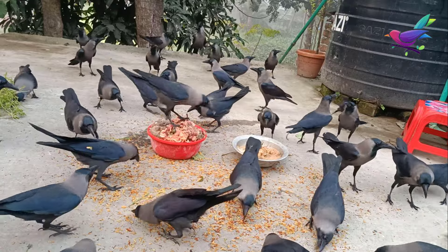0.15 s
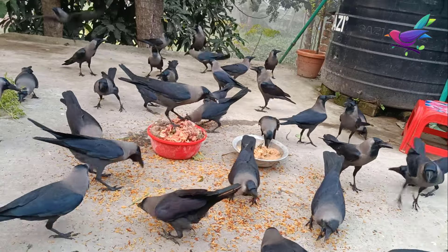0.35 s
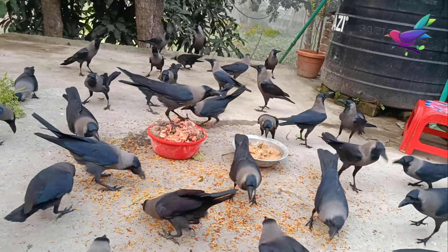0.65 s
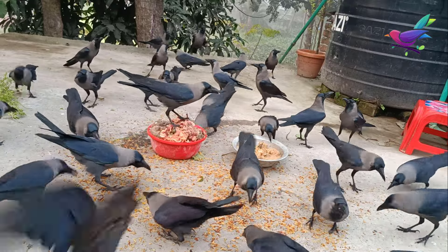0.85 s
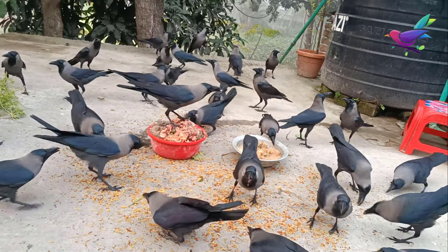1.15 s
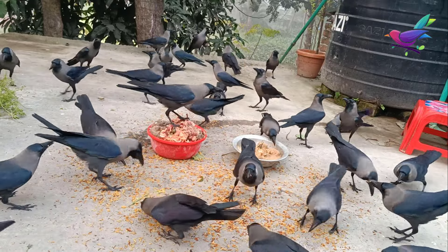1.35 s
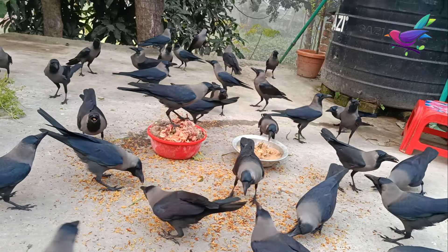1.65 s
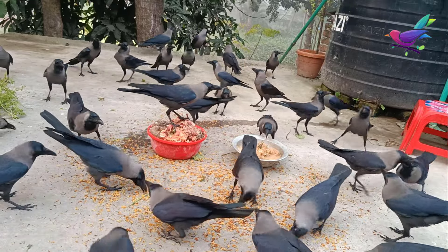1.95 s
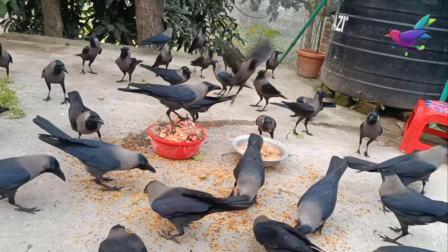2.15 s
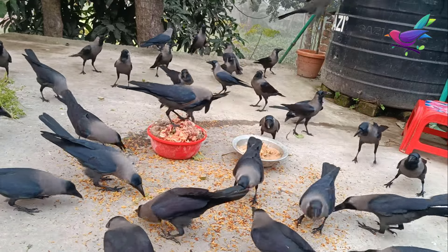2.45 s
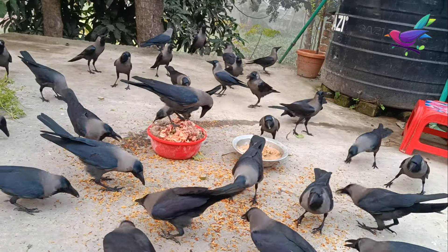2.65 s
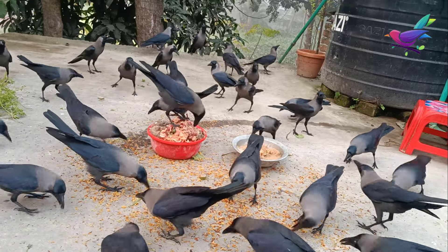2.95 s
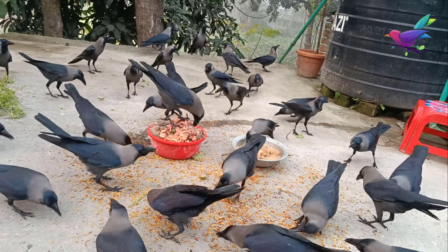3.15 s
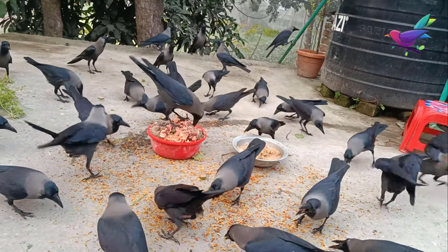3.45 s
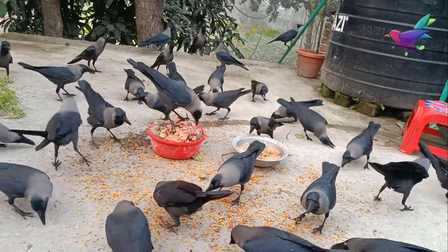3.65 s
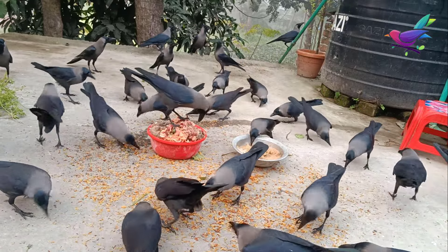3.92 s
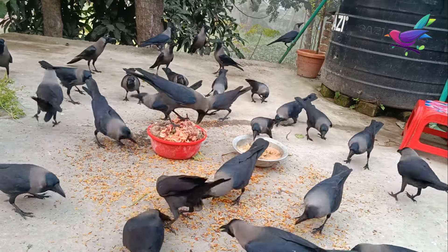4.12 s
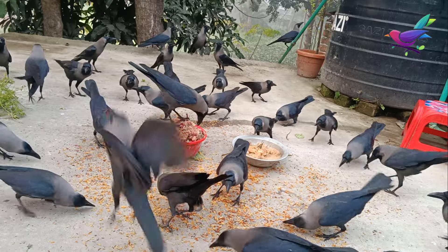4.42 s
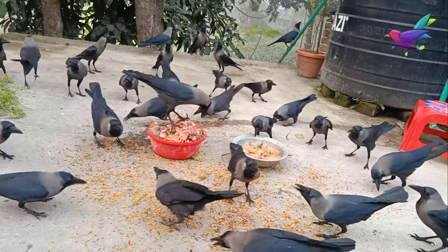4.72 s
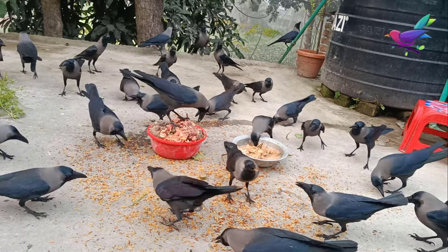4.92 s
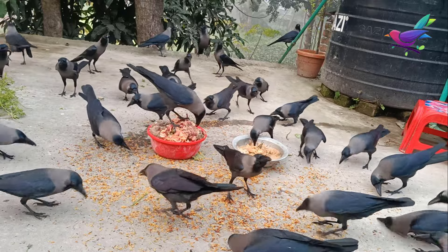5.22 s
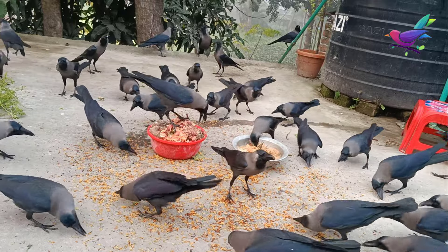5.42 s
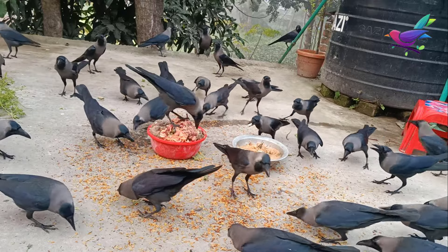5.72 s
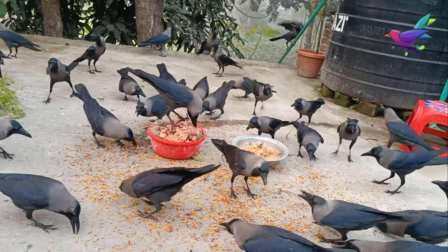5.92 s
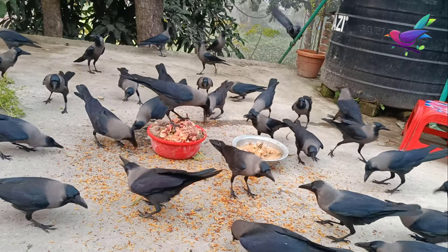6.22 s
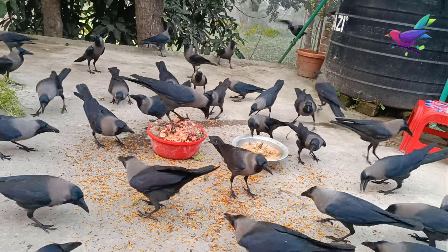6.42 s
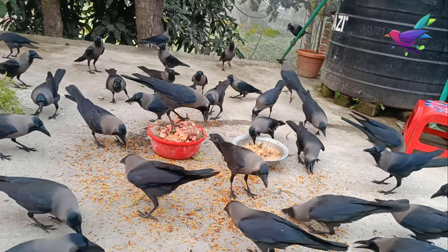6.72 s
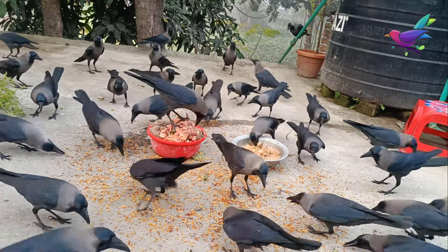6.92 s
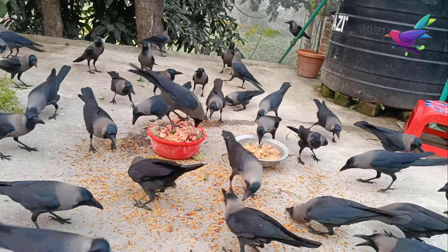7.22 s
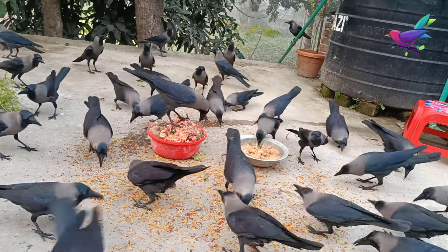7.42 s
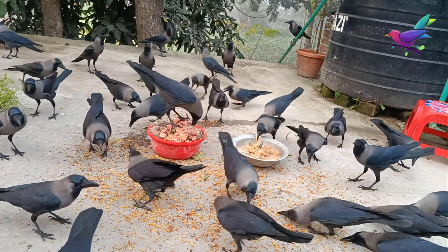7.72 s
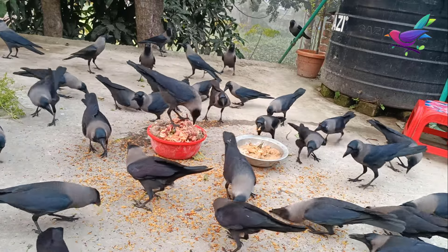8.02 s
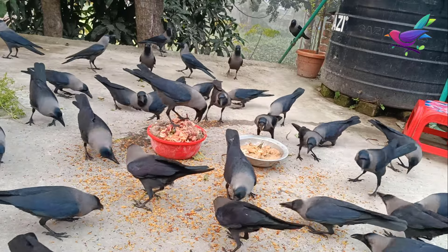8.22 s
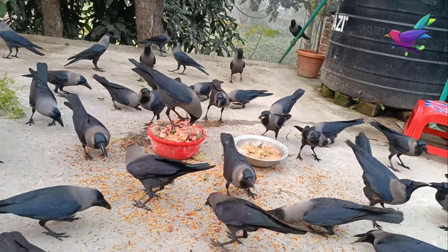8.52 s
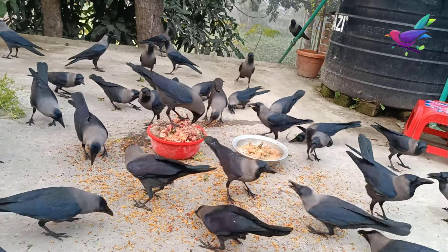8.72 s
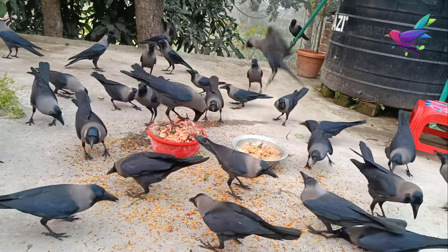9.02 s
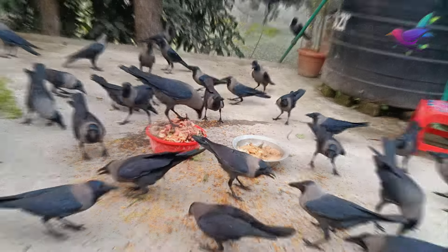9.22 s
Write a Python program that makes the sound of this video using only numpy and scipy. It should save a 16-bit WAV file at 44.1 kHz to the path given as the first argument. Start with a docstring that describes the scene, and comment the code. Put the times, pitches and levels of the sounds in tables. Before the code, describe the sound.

Close stereo pickup of a noisy crow flock outdoors: dry, rattling caws at slightly different pitches, a few thinner and clearer. Soft pecks and claw patter run beneath. Wingbeats push deep puffs of air at the microphone around two seconds, and a sharp thump lands on the left near six. Short lulls follow, then overlapping caws return with faint scratchy whistles over a quiet outdoor rumble.

```python
"""In a concrete yard a flock of house crows feeds and caws, close to a phone with two microphone ports.
Each caw is a reedy tone chopped and bent by a rattle of some 70 beats a second, shaped by throat and open bill;
three thinner caws are partials gliding together. Wings push gusts of air over the ports and thump,
bills and claws tick on the ground, a small bird whistles behind, and filtered noise is the air outdoors."""
import sys
import numpy as np
from scipy import signal
from scipy.fft import rfft, irfft, next_fast_len
from scipy.io import wavfile
from scipy.ndimage import map_coordinates

SR = 44100
rng = np.random.default_rng(int(sys.argv[2]) if len(sys.argv) > 2 else 0)


def persist_wave(psi):
    """Save psi, clipped to +-1, as 16-bit WAV."""
    counts = np.round(np.clip(psi, -1, 1) * 32767).astype(np.int16)
    wavfile.write(sys.argv[1], SR, np.atleast_2d(counts).T)


N = 413216
TIME = np.arange(N) / SR


def undb(db):
    """Decibels to gain."""
    return 10 ** (np.asarray(db) / 20)


def unit(x):
    """Scale to rms 1."""
    return x / np.sqrt(np.mean(x ** 2) + 1e-18)


def colour(x, points, extra=lambda hz: 0):
    """Causal (minimum-phase) filter through (Hz, dB) points, with an optional extra dB curve."""
    size = next_fast_len(x.shape[-1] // 2 + 1024) * 2
    hz = np.arange(size // 2 + 1) * SR / size + 1
    at_hz, db = np.transpose(points)
    curve_db = np.interp(np.log(hz), np.log(at_hz), db) + extra(hz)
    # folding the cepstrum onto positive times makes the filter causal
    cepstrum = irfft(np.log(undb(curve_db)))
    cepstrum[1:size // 2] *= 2
    cepstrum[size // 2 + 1:] = 0
    response = np.exp(rfft(cepstrum))
    return irfft(rfft(x, size) * response, size)[..., :x.shape[-1]]


def sliding_colour(x, points, extra, scale):
    """Like colour, but the filter's frequencies move by a factor that changes with time."""
    clock = np.cumsum(scale)
    source_place = np.interp(np.arange(clock[-1]), clock, np.arange(len(x)))
    warped = map_coordinates(x, [source_place])
    return map_coordinates(colour(warped, points, extra), [clock])


def walk(t, rate):
    """Smooth chance of spread near 1, with a new random value `rate` times a second."""
    values = rng.standard_normal(4096)
    return 1.23 * np.interp(t * rate, np.arange(len(values)), values)


def swell(u, attack, release):
    """Attack, hold and release over a sound's course from 0 to 1."""
    return np.clip(np.minimum(u / attack, (1 - u) / release), 0, 1)


def sides(db):
    """Left and right gains of equal total power for a level difference."""
    half = np.atleast_1d(db) / 2
    pair = np.array([undb(half), undb(-half)])
    return pair / np.sqrt(np.mean(pair ** 2, axis=0))


def add(out, start, x):
    """Mix a stereo sound in at a time in seconds."""
    i = int(start * SR)
    lo, hi = max(i, 0), min(i + x.shape[1], N)
    if hi > lo:
        out[:, lo:hi] += x[:, lo - i:hi - i]


WALLS_DB, WALLS_SPREAD_S = -2.5, .024  # early echoes against the direct sound, and their span


def at_ports(x, lag_ms, walls_db=WALLS_DB, shade_db=2.5, balance_db=-1.5, count=14):
    """The direct sound reaches one port first; ground, tank and walls add scattered early echoes."""
    size = 32768
    hz = np.arange(size // 2 + 1) * SR / size
    # half the lag on each port, in opposite directions; a positive lag delays the left
    direct = np.exp(-1j * np.pi * hz * lag_ms / 1000 * np.array([[1], [-1]]))
    echoes = np.zeros((2, size))
    for ear in echoes:
        late = rng.random(count)
        strengths = rng.choice([-1, 1], count) * np.exp(-late)
        ear[(SR * WALLS_SPREAD_S * late).astype(int)] = unit(strengths) / np.sqrt(count)
    walls = undb(walls_db)
    paths = (direct + walls * rfft(echoes)) / np.hypot(1, walls)
    # the lag also shifts the balance towards the port that hears the sound first
    return irfft(rfft(x, size) * paths) * sides(balance_db - shade_db * lag_ms)


YARD_T60_S, YARD_DB = .26, -14  # decay by 60 dB; level of the tail against the direct sound


def yard(x):
    """A short, faint tail from house fronts and trees: noise that fades exponentially."""
    t = np.arange(SR // 2) / SR
    tail = rng.standard_normal((2, len(t))) * undb(-60 * t / YARD_T60_S) * np.minimum(t / .02, 1)
    tail = unit(tail) / np.sqrt(len(t))
    return x + undb(YARD_DB) * signal.fftconvolve(x, tail, axes=1)[:, :N]


# The air of the place, far from the microphone. Each row: frequency in Hz, relative level in dB.
AIR_COLOUR = [(25, -0.5), (50, 2), (100, -5), (200, -6.5), (400, -12.5), (800, -15), (2000, -22.5),
              (3200, -30.5), (5000, -30), (9000, -36), (15000, -52)]
AIR_DB, SWELL_DB = -42.5, 1.2  # level; spread of its slow wavering


def outdoors():
    """Distant rumble and rustle, as filtered noise; the bass is alike at both ports."""
    mid = colour(rng.standard_normal(N), AIR_COLOUR)
    side = colour(rng.standard_normal(N), AIR_COLOUR, lambda hz: -14 / (1 + (hz / 350) ** 2))
    ports = mid + side * np.array([[1], [-1]])
    return unit(ports) * undb(AIR_DB + SWELL_DB * walk(TIME, 8.2))


WHISTLE_ATTACK, WHISTLE_RELEASE = 0.15, 0.3  # shares of a note's length
WHISTLE_CLIMB_PER_S, WHISTLE_SLUR_S = 1.5, .024  # relative climb; time to half the snap down
WHISTLE_RISE_DB_PER_S, WHISTLE_FADE_DB_PER_S = 130, 35
# A small bird's notes, behind the crows. Each row: time of the pitch top in seconds, rise in seconds,
# fall in seconds, top pitch in Hz, pitch it levels off towards in Hz, level about the top in dB.
WHISTLES = [(6.08, 0.16, 0.089, 3270, 3220, -57), (6.72, 0.018, 0.19, 3600, 3590, -45),
            (7.03, 0.043, .04, 3100, 2980, -56), (7.115, 0.023, 0.13, 3080, 2820, -41),
            (7.925, .015, 0.036, 3280, 2880, -44), (8.024, .015, .03, 3380, 2920, -43),
            (8.62, .09, 0.11, 4070, 2710, -35.5), (9.069, .07, 0.15, 3650, 2660, -35)]


def small_bird(waver=.022, flutter_db=3.5):
    """Thin, scratchy whistles from the trees: each climbs faintly to a top, then snaps down and levels off."""
    out, t = np.zeros((2, N)), np.arange(SR // 3) / SR
    for top_s, rise, fall, top_hz, end_hz, db in WHISTLES:
        before, after = np.maximum(rise - t, 0), np.maximum(t - rise, 0)
        slur = end_hz + (top_hz - end_hz) / (1 + (after / WHISTLE_SLUR_S) ** 3)
        pitch = (1 - WHISTLE_CLIMB_PER_S * before) * slur * (1 + waver * walk(t, 625))
        shape_db = flutter_db * walk(t, 108) - WHISTLE_RISE_DB_PER_S * before - WHISTLE_FADE_DB_PER_S * after
        size = swell(t / (rise + fall), WHISTLE_ATTACK, WHISTLE_RELEASE) * undb(db + shape_db)
        note = size * np.sin(2 * np.pi * np.cumsum(pitch) / SR)
        add(out, top_s - rise, at_ports(note, 0.025, walls_db=0))
    return out


# A peck: a short rise, a tick, and a fainter, slower decay, whose level is against the tick.
PECK_RISE_S, TICK_S, DECAY_S, DECAY_DB = .002, .0025, .01, -12
PATTER_SCATTER_DB = 4
# Bills and claws on concrete and bowls. Each row: start in seconds, level in dB.
PECKS = [(1.884, -28), (2.83, -29.5), (3.656, -25.5), (4.298, -44), (4.497, -32), (4.666, -33), (5.13, -39),
         (5.227, -55), (5.61, -35), (5.999, -38.5), (6.055, -38), (6.635, -33), (6.92, -31.5), (6.956, -32),
         (7.022, -45), (7.129, -31), (7.777, -32), (8.007, -30), (8.483, -32), (8.624, -29), (9.079, -32),
         (9.149, -33)]
# Their tone on the ground. Each row: frequency in Hz, relative level in dB.
PECK_COLOUR = [(200, -29), (1000, 11), (3000, 3), (6500, 13.5), (10000, 2), (15000, -3)]


def feeding(patter_db=-49, count=220):
    """Pecks over a patter of claws and scattered grain: short bursts of filtered noise."""
    out, t = np.zeros((2, N)), np.arange(SR // 20) / SR
    patter = [(rng.uniform(0, N / SR), patter_db + PATTER_SCATTER_DB * rng.standard_normal())
              for _ in range(count)]
    events = PECKS + patter
    tick_and_decay = np.exp(-t / TICK_S) + undb(DECAY_DB) * np.exp(-t / DECAY_S)
    contact = np.minimum(t / PECK_RISE_S, 1) * tick_and_decay
    noise = rng.standard_normal((len(events), 2, len(t)))
    ticks = unit(colour(noise, PECK_COLOUR)) * contact
    for (start, db), tick in zip(events, ticks):
        add(out, start, undb(db) * tick)
    return out


GUST_ATTACK, GUST_RELEASE = 0.21, 0.39  # shares of a puff's length
# Puffs of air from wing beats, on the microphone ports themselves. Each row: start in seconds,
# length in seconds, level in dB, left minus right in dB.
GUSTS = [(0.687, 0.4, -50, 5), (1.283, 0.24, -28, -1), (1.462, 0.29, -19.5, 13), (1.644, 0.23, -22.5, 5.5),
         (1.882, 0.1, -23.5, -7), (2.058, 0.15, -20.5, 20), (2.173, 0.14, -14.5, 18),
         (2.304, .12, -22.5, 9), (2.38, 0.3, -27.5, -10), (2.74, 0.21, -33.5, -6), (3.495, 0.35, -43.5, -1),
         (3.917, 0.2, -31.5, -26), (4.173, 0.18, -30.5, -13), (4.367, 0.17, -25, -15),
         (4.494, 0.19, -24.5, -31), (5.856, 0.2, -21, 36), (6.02, 0.17, -19.5, 27), (6.178, 0.12, -26, 5)]
# Rumble of the eddies. Each row: frequency in Hz, relative level in dB.
GUST_COLOUR = [(20, -6.5), (45, 5.5), (90, -2.5), (170, -7.5), (280, -21.5), (500, -28.5), (1000, -64),
               (3000, -87)]


def wing_gusts():
    """Eddies from beating wings rumble on each port separately, as low noise that swells and fades."""
    out = np.zeros((2, N))
    eddies = unit(colour(rng.standard_normal((2, N)), GUST_COLOUR))
    for start, length, db, pan_db in GUSTS:
        puff = swell((TIME - start) / length, GUST_ATTACK, GUST_RELEASE)
        out += eddies * puff * undb(db) * sides(pan_db)
    return out


# Wing strokes that thump close to the ports. Each row: start in seconds, level in dB,
# length in seconds, left minus right in dB.
BUFFETS = [(1.334, -21.5, 0.046, -1), (1.563, -16.5, 0.057, 21), (1.697, -22.5, 0.049, 20),
           (2.153, -22, 0.05, 31), (2.226, -25.5, 0.04, 28), (4.408, -49, 0.033, -18),
           (4.544, -29, 0.023, -28), (4.659, -30, 0.14, 0), (5.882, -23, 0.0072, 33),
           (5.891, -9.5, 0.006, 36), (5.901, -14.5, 0.01, 36), (5.916, -13, 0.0079, 36),
           (5.982, -24.5, 0.017, 33), (6.069, -24, 0.013, 22), (6.576, -43, 0.014, 2),
           (7.065, -31, 0.06, -2)]
# Dull tone of the thumps. Each row: frequency in Hz, relative level in dB.
BUFFET_COLOUR = [(30, -19), (90, -1.5), (200, 8.5), (450, -6), (900, -15.5), (2000, -71), (6000, -170)]


def wing_buffets():
    """Direct strokes thump: each is one arch-shaped push of low noise."""
    out, t = np.zeros((2, N)), np.arange(SR // 4) / SR
    for start, db, length, pan_db in BUFFETS:
        push = np.sin(np.pi * np.clip(t / length, 0, 1))
        noise = unit(colour(rng.standard_normal((2, len(t))), BUFFET_COLOUR))
        add(out, start, noise * push * undb(db) * sides(pan_db))
    return out


# Three thinner caws, two clear and one broken and far off. Each row: time in seconds, pitch in Hz, level in dB.
FALLING_CAW = [(3.34, 480, -50), (3.40, 492, -40), (3.47, 487, -25), (3.55, 455, -23.5),
               (3.60, 425.5, -21.5), (3.65, 394, -35)]
SOLO_CAW = [(4.39, 519, -52), (4.42, 575, -35), (4.465, 590, -33), (4.55, 560, -39), (4.62, 520, -55),
            (4.68, 435, -41), (4.72, 385, -44)]
FAR_CAW = [(6.945, 447, -50), (6.97, 452, -39), (7.02, 470, -39.5), (7.125, 449, -38), (7.16, 435, -62)]
# Their partials. Each row: multiple of the pitch, relative level in dB.
FALLING_PARTIALS = [(2, -8.5), (3, -5), (4, 3.5), (5, -7), (9, -17), (10, -31), (13, -28), (14, -33)]
SOLO_PARTIALS = [(1, -16), (2, 2.5), (3, 1), (4, -2.5), (7, -11), (8, -25), (9, -14), (10, -17), (11, -13)]
FAR_PARTIALS = [(2, -15), (4, -4)]
# The same three callers. Each row: course, partials, flutter in Hz at the highest pitch, flutter depth (0-1),
# pitch swing (0-1), roughness of pitch (0-1), lag of the left port in ms.
CLEAR_CAWS = [(FALLING_CAW, FALLING_PARTIALS, 73, .3, .007, .004, -.15),
              (SOLO_CAW, SOLO_PARTIALS, 78, .55, .011, .006, 0),
              (FAR_CAW, FAR_PARTIALS, 33, .9, .035, .04, .37)]


def clear_crows():
    """Caws with little rattle: clean partials glide together under a flutter."""
    out, t = np.zeros((2, N)), np.arange(SR // 2) / SR
    for course, partials, flutter_hz, depth, swing, rough, lag_ms in CLEAR_CAWS:
        times, hz, db = np.transpose(course)
        now = times[0] + t
        pitch = np.interp(now, times, hz)
        flutter_rate = flutter_hz * pitch / hz.max() * (1 + walk(t, 38) / 20)
        flutter = np.cos(2 * np.pi * np.cumsum(flutter_rate) / SR)
        bent_pitch = pitch * (1 + swing * flutter + rough * walk(t, 251))
        phase = 2 * np.pi * np.cumsum(bent_pitch) / SR
        chord = sum(undb(partial_db) * np.sin(round(k) * phase + k * k) for k, partial_db in partials)
        tone = unit((1 + depth * flutter) * chord)
        level = undb(np.interp(now, times, db)) * (t < times[-1] - times[0])
        add(out, times[0], at_ports(tone * level, lag_ms, walls_db=-4.5))
    return out


# The low croak as a caw runs out of air: lead before the call's end, length, pitch fall (0-1), level under the call
CROAK_LEAD_S, CROAK_S, CROAK_FALL, CROAK_DB = .065, 0.11, 0.43, -22
# Its dull tone. Each row: frequency in Hz, relative level in dB.
CROAK_COLOUR = [(120, -22), (250, -12.5), (520, 4), (750, -0.5), (1100, -17), (3000, -68)]


def croak(pitch_hz, rattle_hz):
    """The slackening membranes slide down in pitch and gurgle behind the shut bill."""
    t = np.arange(SR // 6) / SR
    u = np.minimum(t / CROAK_S, 1)
    # pitch and gurgle both start at 0.7 of the caw's and slow down together
    slack = .7 * (1 - CROAK_FALL * u) * (1 + .03 * walk(t, 200))
    clock = 2 * np.pi * np.cumsum(slack) / SR
    gurgle = 1 + np.cos(rattle_hz * clock) / 2
    pulses = sum(np.cos(k * pitch_hz * clock) for k in range(1, 5)) * gurgle
    return unit(colour(pulses, CROAK_COLOUR)) * np.sin(np.pi * u)


JITTER, WOBBLE = .01, .014  # unsteadiness of a fully hoarse caw: share of the rattle rate; cycles of the tone
SCOOP, DROP = .21, .35  # shares of pitch: strength of the opening scoop, loss in the final collapse
RASP_DB, ODD_DB = -21, -9  # hiss at 2300 Hz and below; odd partials in a low call
HOARSE_SWING, CLEAR_SHARE = 0.1048, 0.15  # pitch swing of a fully hoarse caw; hoarseness left without swing
SHUT, THROAT_FOLLOWS = .94, .1  # resonance factor with bill shut; power of the pitch arch that moves it
RING_HZ, RING_WIDTH_HZ = 4900, 550  # a ringing bill: centre and half width before the throat moves it
# Push of breath. Each row: place in the call (0-1), level in dB.
EFFORT = [(0, -22), (.055, -6), (.18, -2), (.45, 0), (.75, 0), (.87, -3), (.95, -9), (1, -26)]
# How far the bill is open. Each row: place in the call (0-1), opening (0-1).
GAPE = [(0, .1), (.12, .45), (.3, 1), (.8, 1), (.9, .6), (1, 0)]
# A crow's throat and bill, wide open on a 480 Hz call. Each row: frequency in Hz, relative level in dB.
VOICE = [(250, -27.5), (500, -24.5), (680, -9), (850, -7), (1050, -7.5), (1350, -2), (1600, -9),
         (1850, -3.5), (2100, -6.5), (2450, -24), (3200, -29.5), (4100, -15), (6400, -15.5), (8000, -24),
         (14500, -43)]


def caw(length, pitch_hz, top, sag, rattle_hz, bend, throat_db, bill_db, ring_db,
        lean=0.42, hiss_db=-5, reed_db=-5, stretch=0.31, waver=0.00687):
    """One call: membrane pulses whose pitch and strength swing with every beat of the rattle."""
    t = np.arange(SR // 2) / SR
    u = np.minimum(t / length, 1)
    # the pitch scoops up, sags, and collapses as the air runs out
    scoop = SCOOP * np.maximum(1 - u / top, 0) ** 2.3
    sinking = 1.15 * sag * (np.maximum(u - top, 0) / (1 - top)) ** 1.8
    collapse = DROP * np.maximum((u - .82) / .18, 0) ** 2
    arch = (1 - scoop - sinking) * (1 - collapse)
    # calls with little swing are steadier and whine more than they rasp
    hoarse = np.interp(bend, [0, HOARSE_SWING], [CLEAR_SHARE, 1])
    unsteady = 1 + hoarse * JITTER * walk(t, 69.78) + waver * walk(t, 14)
    beat = np.cumsum(rattle_hz * arch * unsteady) / SR
    # in a hoarse call each beat starts the membranes afresh; they are strongest in its low-pitched half
    swing = 2 * np.pi * (beat % 1)
    cycles = beat % 1 if hoarse > .5 else beat
    bent_cycles = cycles + bend * (1 - np.cos(swing)) / (2 * np.pi)
    phase = pitch_hz / rattle_hz * bent_cycles + hoarse ** 2 * WOBBLE * walk(t, 260)
    chop = (1 - (1 + np.cos(swing - lean)) / 5) * np.minimum(10 * np.sin(swing / 2), 1)
    strength = 1 - hoarse * (1 - chop * undb(1.2 * walk(t, 110)))
    # the membranes close softly, so the upper partials are spread through the cycle
    # in low calls the two membranes beat almost in turn, which weakens the odd partials
    odd = undb(ODD_DB * np.interp(pitch_hz, [490, 535], [1, 0]))
    partials = sum(odd ** (k % 2) * np.cos(2 * np.pi * k * phase + np.pi * k * k / 16) for k in range(1, 17))
    pulses = colour(unit(strength * partials), [(2500, 0), (4000, reed_db * (2 * hoarse - 1))])
    effort = undb(np.interp(u, *np.transpose(EFFORT))) * (u < 1)
    # turbulent air comes in the same beats and takes over in the treble
    air = unit(np.sqrt(np.abs(strength)) * rng.standard_normal(len(t)))
    hiss = colour(air, [(2300, RASP_DB), (4500, hiss_db), (7500, hiss_db), (9500, 0.11)])
    source = (pulses + hoarse ** 2 * hiss) * effort

    def opening(hz):
        """This bird's throat (low), bill (high) and ring, in dB."""
        throat = throat_db / (1 + (hz / 1400) ** 6)
        bill = (bill_db - ring_db / 3) / (1 + (3000 / hz) ** 6)
        ring = ring_db / (1 + ((hz - RING_HZ) / RING_WIDTH_HZ) ** 2)
        return throat + bill + ring

    # the throat tightens for high calls; a half-shut bill or a sinking pitch lowers all its resonances
    tight = (pitch_hz / 480) ** stretch
    gape = np.interp(u, *np.transpose(GAPE))
    scale = tight * (SHUT + (1 - SHUT) * gape) * arch ** THROAT_FOLLOWS
    voice = sliding_colour(source, VOICE, opening, scale)
    return voice / np.sqrt(np.sum(voice ** 2) / np.sum(effort ** 2))


# One bird on the right has a bill that rings high: its place, reach about that place, and gain.
RINGER_LAG_MS, RINGER_REACH_MS, RING_DB = .21, .04, 9
# The flock close to the microphone. Each row: start in seconds, length in seconds, top pitch in Hz,
# place of the pitch top (0-1), strength of the pitch sag (0-1), rattle in Hz at the pitch top,
# pitch swing per beat (0-1), level in dB, throat in dB, bill in dB, lag of the left port in ms.
CAWS = [ (-.14, 0.39, 479.3, 0.32, 0.15, 72.63, 0.1, -16.5, -11.5, -13, 0.25),
        (-.08, 0.48, 591, 0.18, 0.44, 78, 0.08, -20, -12.5, -15, -0.15),
        (0.136, 0.43, 484, 0.51, 0.2, 70.73, 0.1, -17, -8.5, -13, -0.35),
        (0.222, 0.42, 628, 0.09, 0.3, 78.7, 0.09, -22.5, -12.5, -14.5, 0),
        (0.404, 0.4, 470, 0.36, 0.24, 71.1, 0.1, -19.5, -14.5, -18, 0.33),
        (0.571, .39, 502.7, 0.53, 0.11, 71.56, 0.1, -18, -8, -12, 0.25),
        (0.783, 0.39, 562.3, 0.36, 0.27, 76.6, 0.14, -22.5, -9, -12, 0.092),
        (0.821, 0.37, 514, 0.48, 0.06, 74.25, 0.21, -23.5, -9.5, -7, -0.3),
        (0.985, 0.5, 475.2, 0.33, 0.2, 71.8, 0.09, -19.5, -5, -12.5, -0.45),
        (1.242, 0.39, 485, 0.48, 0.22, 71.3, 0.13, -17, -11, -11.5, -0.36),
        (1.665, 0.38, 561.6, 0.24, 0.4, 74.7, 0.1, -19, -7.5, -11.5, -0.45),
        (1.852, 0.36, 556.4, 0.16, 0.34, 75.04, 0.16, -19.5, -2, -9, -0.58),
        (2.068, 0.39, 486, 0.5, 0.17, 71.2, 0.09, -16.5, -8.5, -12.5, -0.44),
        (2.443, 0.41, 480.3, 0.43, 0.07, 74.04, 0.1, -17, -9.5, -13, 0.23),
        (2.742, 0.35, 498.4, 0.5, 0.11, 73.2, 0.08, -20.5, -12.5, -20.5, -0.25),
        (2.92, 0.38, 486.4, 0.38, 0.06, 74.07, 0.07, -19, -7, -12, 0.23),
        (3.074, 0.37, 468, 0.54, 0.15, 69.83, 0.09, -19.5, -9.5, -23, -0.41),
        (3.149, 0.32, 577.4, 0.46, 0.16, 75.2, .06, -25.5, -38, -19, -0.49),
        (3.334, .29, 500.4, 0.25, 0.12, 73.5, 0.12, -25.5, -10, -8.5, -0.22),
        (3.576, 0.35, 492, 0.39, 0, 73.7, 0.08, -22.5, -12, -18.5, -0.273),
        (3.853, 0.37, 459.4, 0.44, 0.06, 69.9, 0.08, -20, -7, -15, -0.48),
        (4.376, 0.36, 522, 0.28, 0.2, 78.2, 0.04, -29, -23, -23.5, -0.014),
        (4.755, 0.35, 470.8, 0.31, 0.03, 70.54, 0.1, -19, -7.5, -12.5, -0.49),
        (4.76, 0.39, 561.7, 0.29, 0.14, 76.1, 0.07, -24, -19, -16.5, 0.062),
        (5.279, 0.36, 497, 0.74, 0.07, 72.65, 0.1, -18.5, -8, -12.5, 0.2),
        (5.48, 0.385, 483.5, 0.61, 0, 71.1, 0.11, -20, -13, -14.5, -0.45),
        (6.137, 0.48, 462, 0.41, 0.14, 71.5, 0.12, -20, -8, -11, 0.24),
        (6.371, 0.25, 539, 0.29, .07, 74.3, 0.1, -23.5, -11.5, -11, 0.168),
        (6.574, 0.067, 446.5, 0.23, 0.18, 69.9, 0.07, -25, -25, -13, 0.12),
        (6.596, 0.22, 548, 0.58, 0.2, 72.9, 0.12, -30, -3.5, -8.5, 0.008),
        (7.12, 0.16, 563, 0.2, 0, 74.9, 0.1, -36.5, 9, -0.5, 0.36),
        (7.226, 0.4, 499.6, 0.61, 0.38, 73.5, 0.27, -25, 3, -4, 0),
        (7.299, 0.4, 578.4, 0.19, 0.12, 74.45, 0.1, -24, -25, -17, -0.14),
        (7.417, .39, 466.4, 0.41, 0.16, 73.6, 0.1, -19, -13.5, -15.5, 0.23),
        (7.68, 0.39, 455, 0.44, 0.44, 72.6, 0.13, -23, -18, -14.5, 0.12),
        (7.924, 0.39, 478.8, 0.6, 0.27, 74.2, 0.15, -24, -7, -11.5, 0),
        (8.11, 0.38, 474.3, 0.5, 0.19, 72.7, 0.12, -19, -12, -14.5, 0.27),
        (8.465, 0.41, 499, 0.47, 0.16, 74.4, 0.11, -22, -10, -13.5, 0.59),
        (8.654, 0.47, 493.3, 0.4, 0.24, 72, 0.19, -21.5, -6.5, -12, 0.41),
        (8.905, 0.31, 572, 0.19, 0.12, 76.8, 0.09, -20.5, -9, -16.5, 0.27),
        (9.14, 0.27, 481.4, 0.64, 0.34, 73.2, 0.25, -20, -11, -12.5, 0.31)]


def crows():
    """All the rattling caws, each from its own place and ending in a croak."""
    out = np.zeros((2, N))
    for start, length, pitch_hz, top, sag, rattle_hz, bend, db, throat_db, bill_db, lag_ms in CAWS:
        ring_db = RING_DB * np.exp(-((lag_ms - RINGER_LAG_MS) / RINGER_REACH_MS) ** 2)
        top = np.clip(top, .05, .9)
        voice = caw(length, pitch_hz, top, sag, rattle_hz, bend, throat_db, bill_db, ring_db)
        add(out, start, undb(db) * at_ports(voice, lag_ms))
        low_end = at_ports(croak(pitch_hz, rattle_hz), lag_ms)
        add(out, start + length - CROAK_LEAD_S, undb(db + CROAK_DB) * low_end)
    return out


def scene():
    """Birds in the yard, wing gusts at the microphone, background."""
    birds = small_bird() + feeding() + clear_crows() + crows()
    wings = wing_gusts() + wing_buffets()
    return outdoors() + wings + yard(birds)


TOP_HZ = 15300


def record(dry):
    """The phone cuts the top: a steep low-pass filter."""
    return signal.sosfilt(signal.ellip(8, .2, 70, TOP_HZ, fs=SR, output="sos"), dry)


dry = scene()
out = record(dry)
persist_wave(out)
```